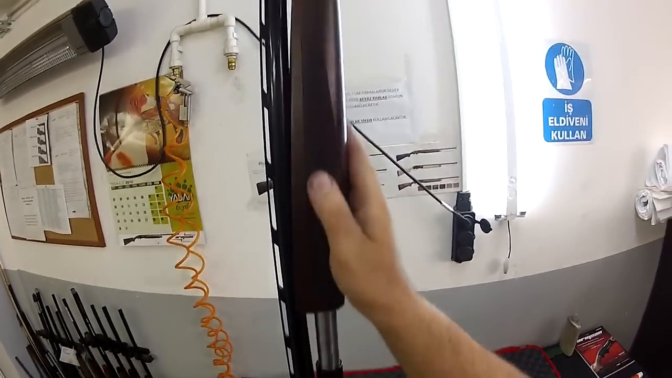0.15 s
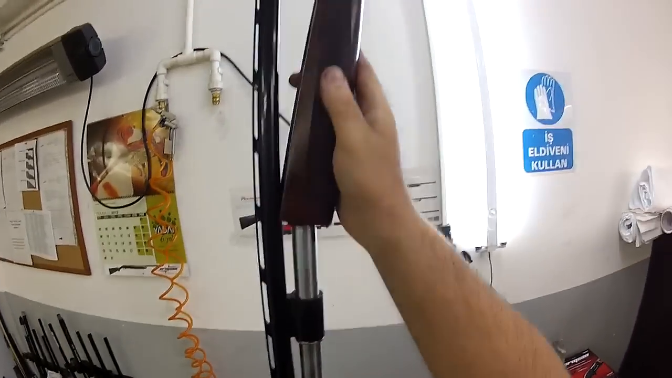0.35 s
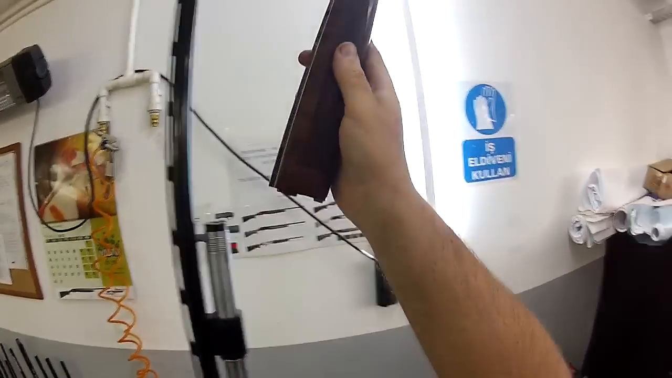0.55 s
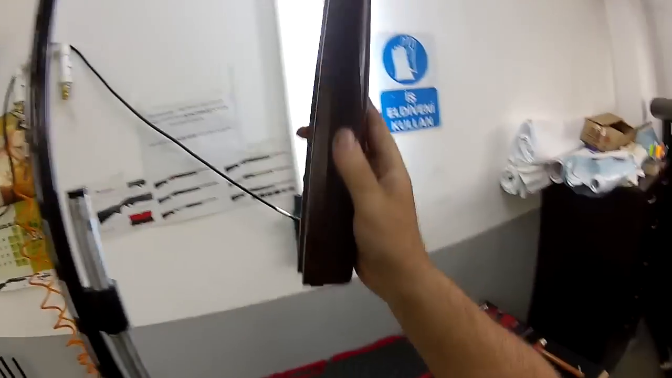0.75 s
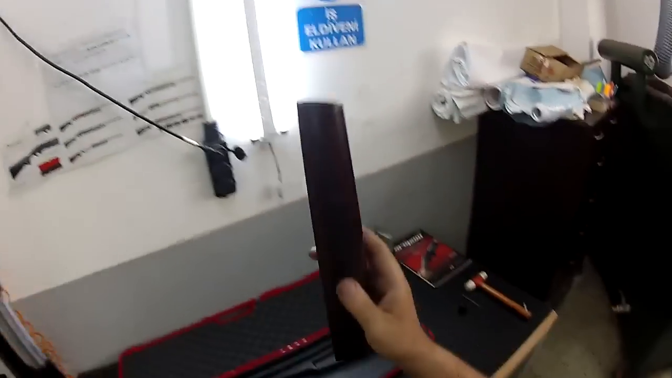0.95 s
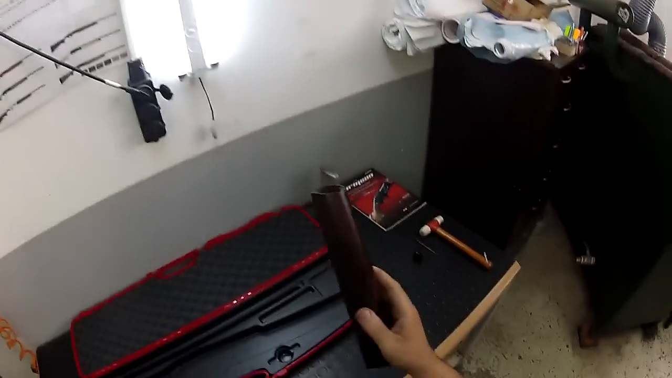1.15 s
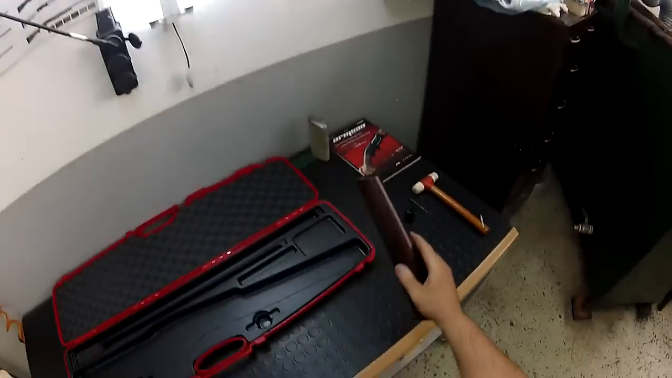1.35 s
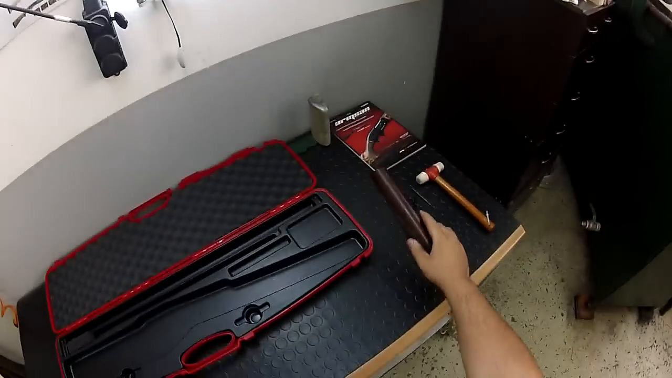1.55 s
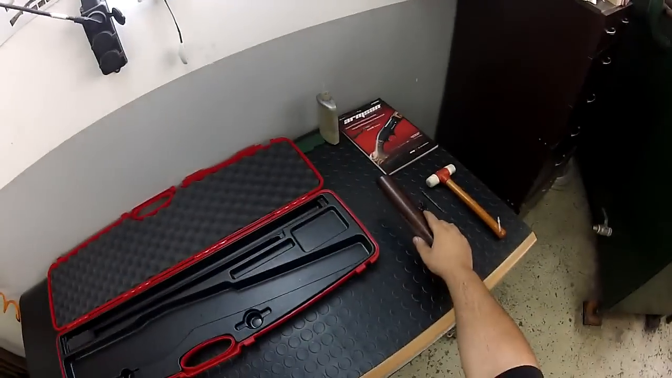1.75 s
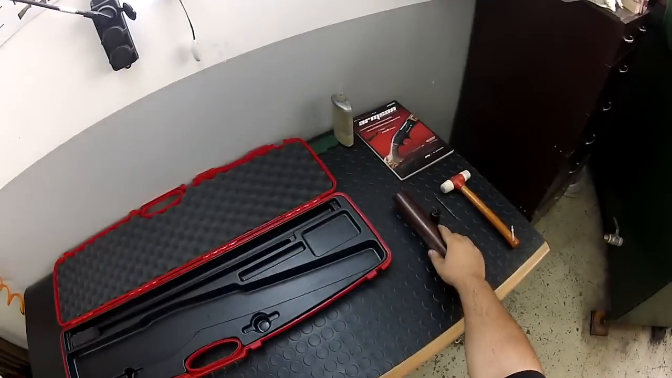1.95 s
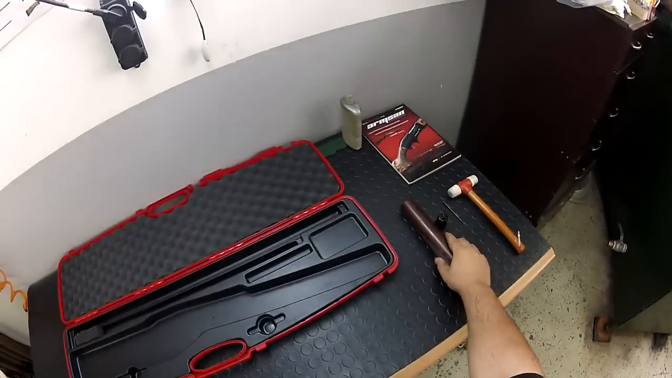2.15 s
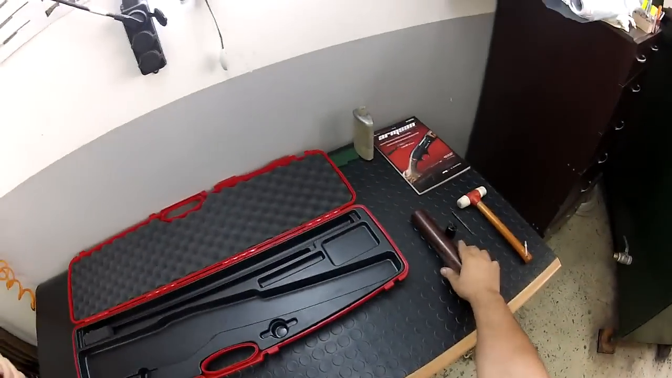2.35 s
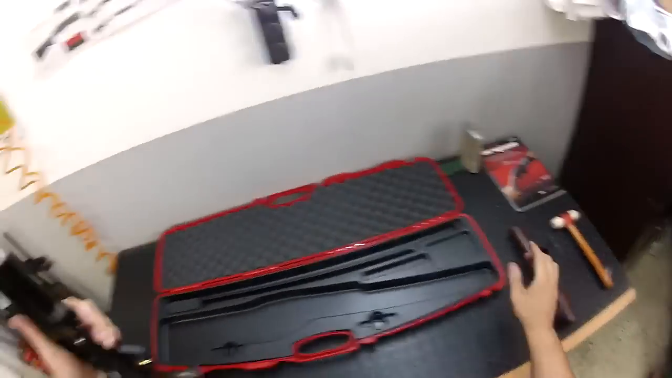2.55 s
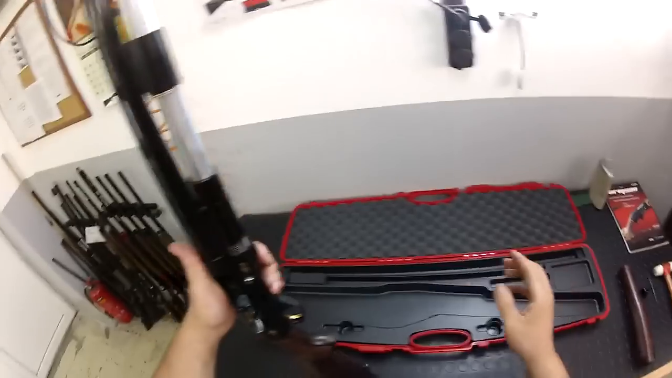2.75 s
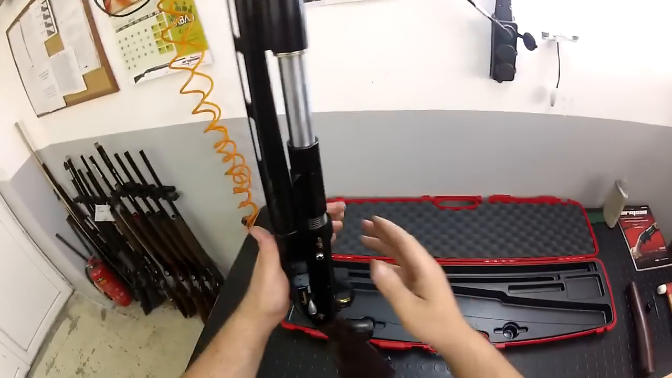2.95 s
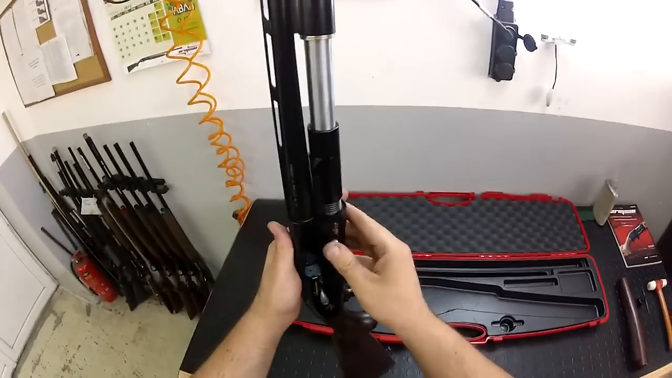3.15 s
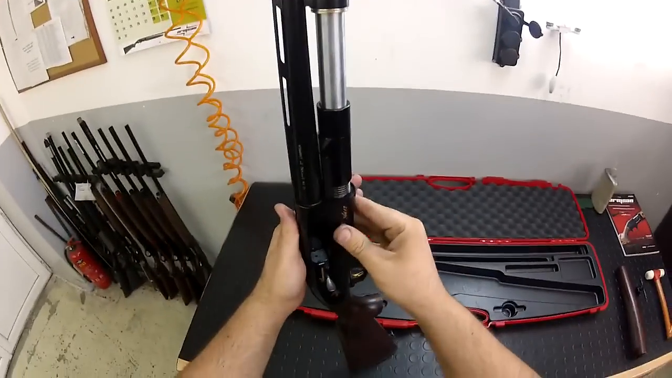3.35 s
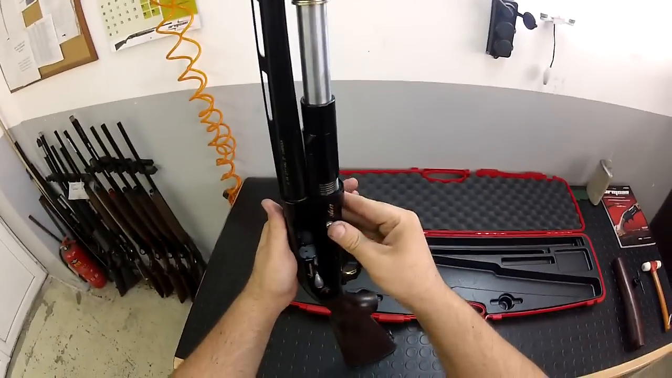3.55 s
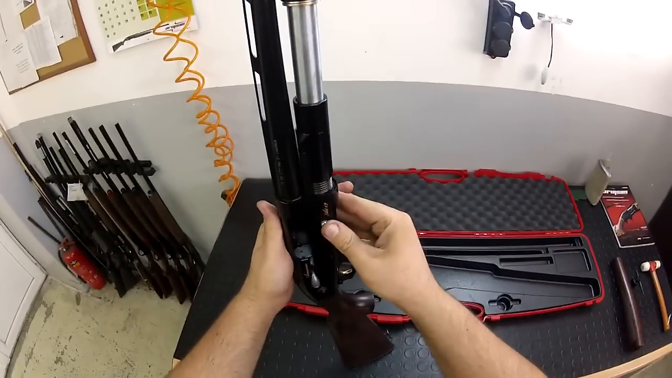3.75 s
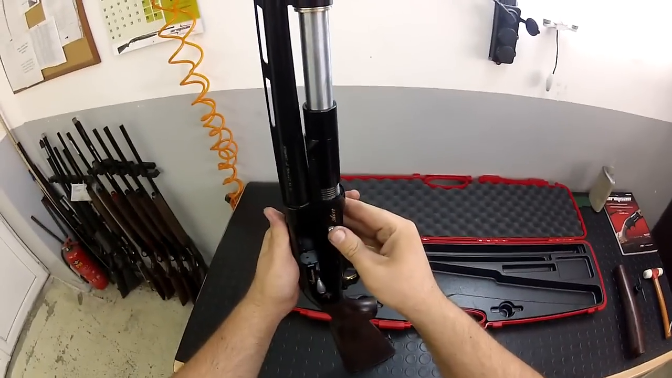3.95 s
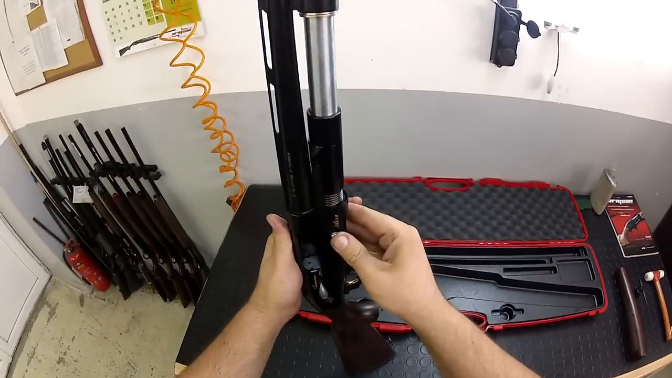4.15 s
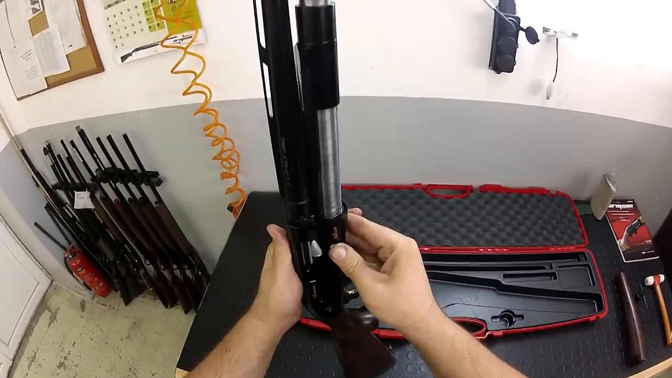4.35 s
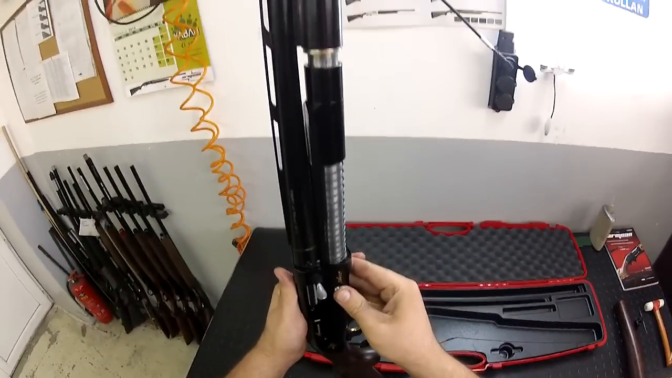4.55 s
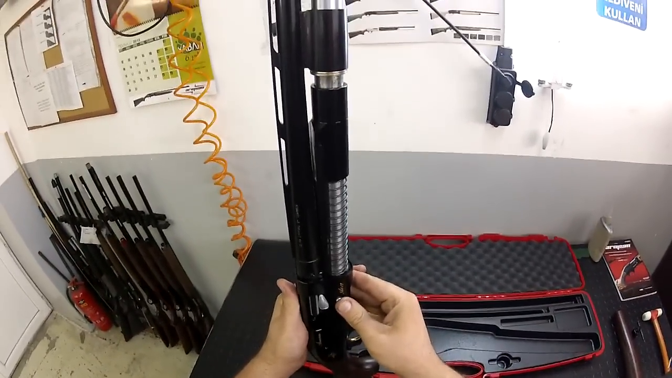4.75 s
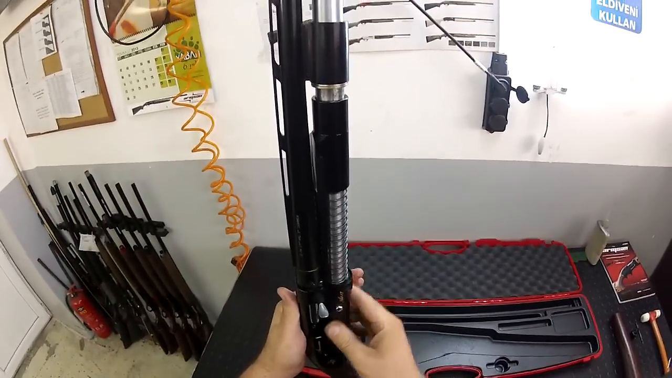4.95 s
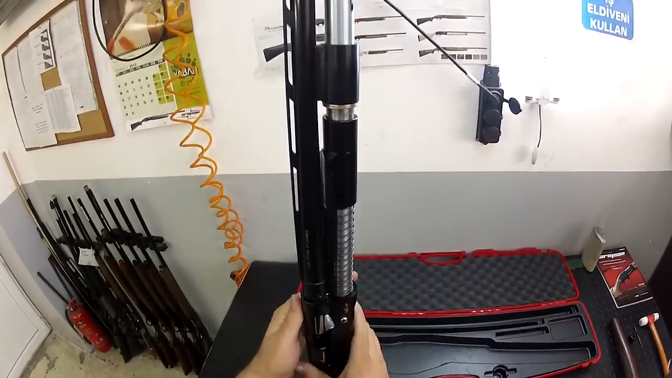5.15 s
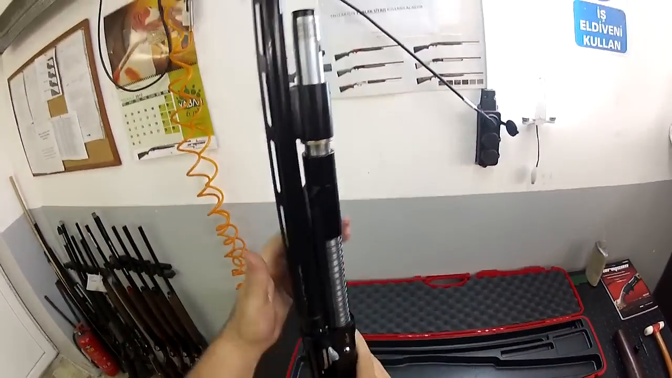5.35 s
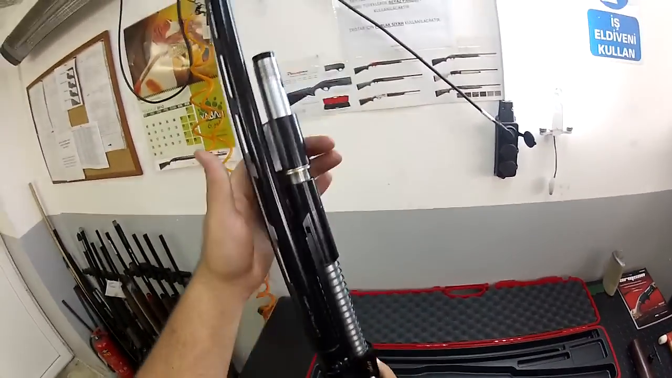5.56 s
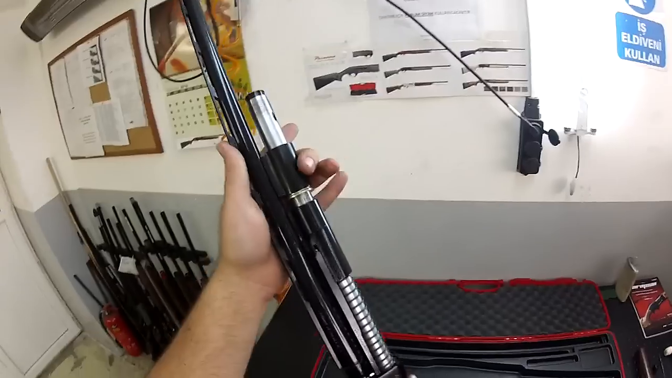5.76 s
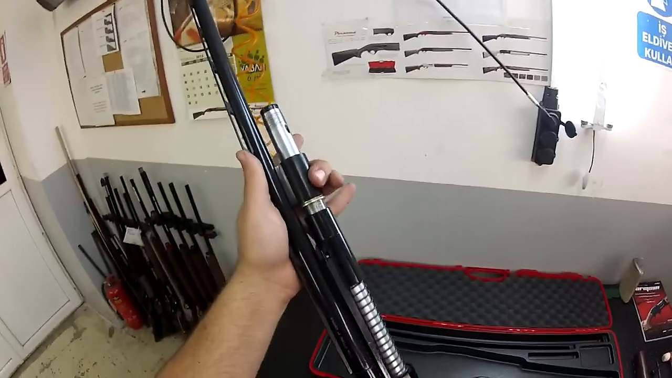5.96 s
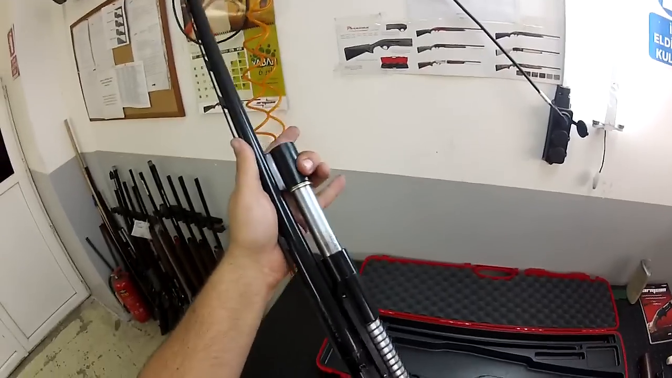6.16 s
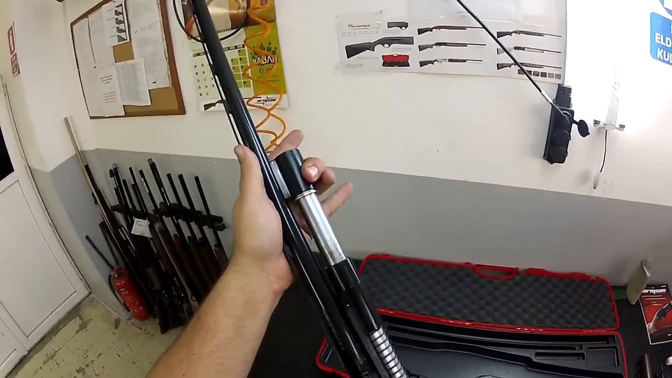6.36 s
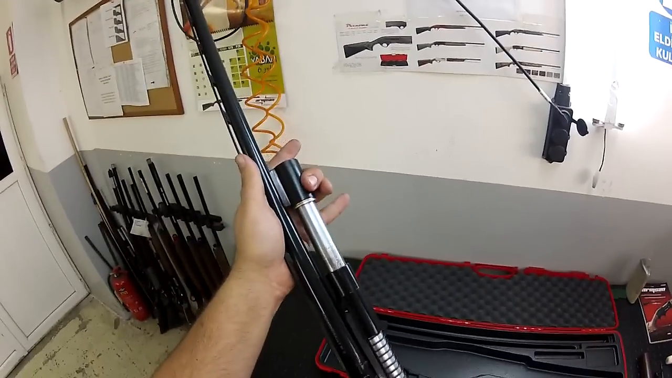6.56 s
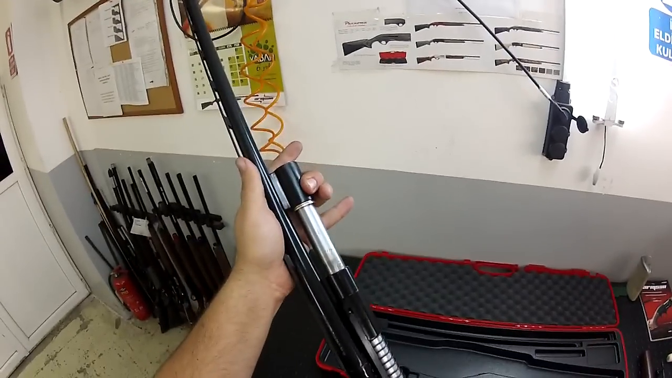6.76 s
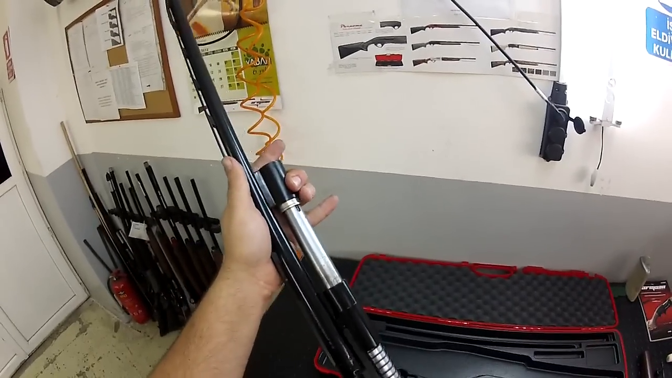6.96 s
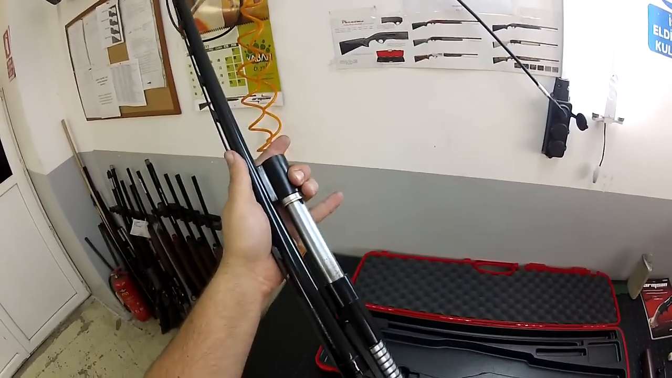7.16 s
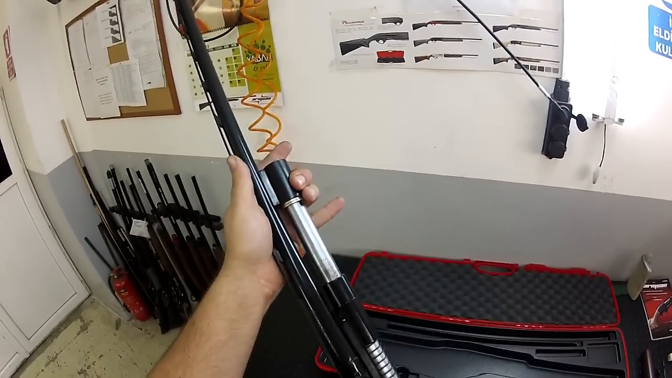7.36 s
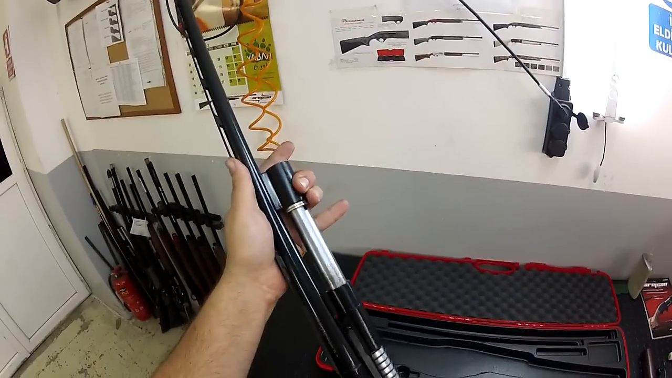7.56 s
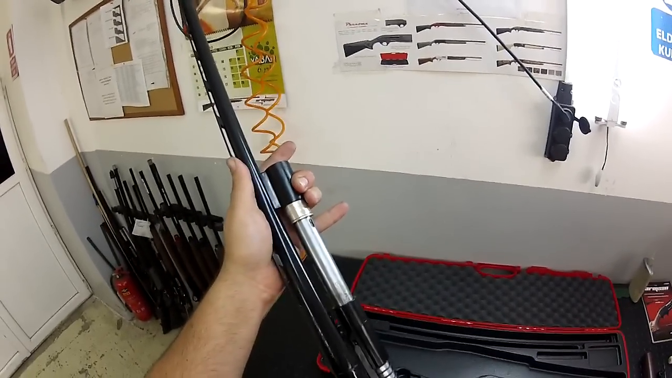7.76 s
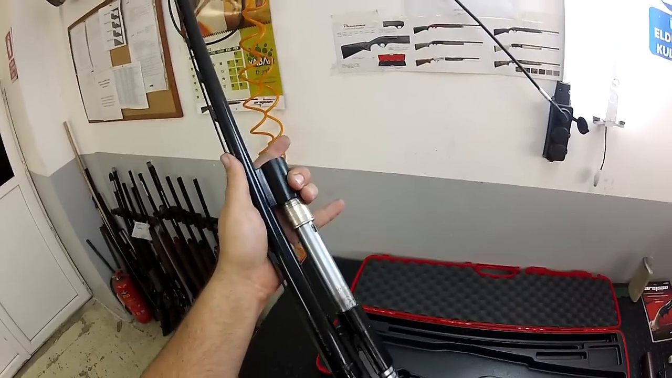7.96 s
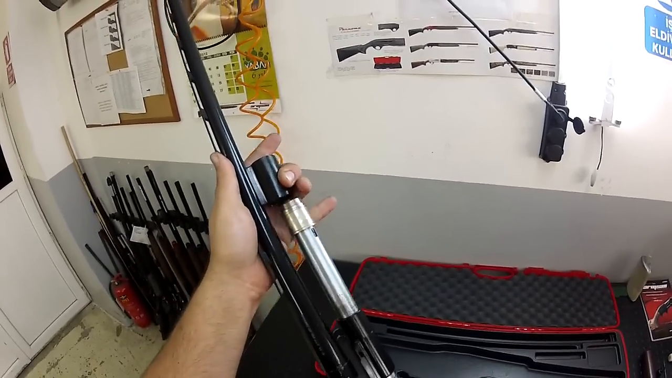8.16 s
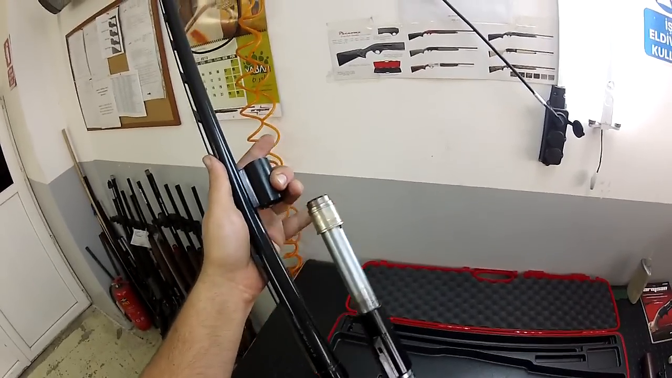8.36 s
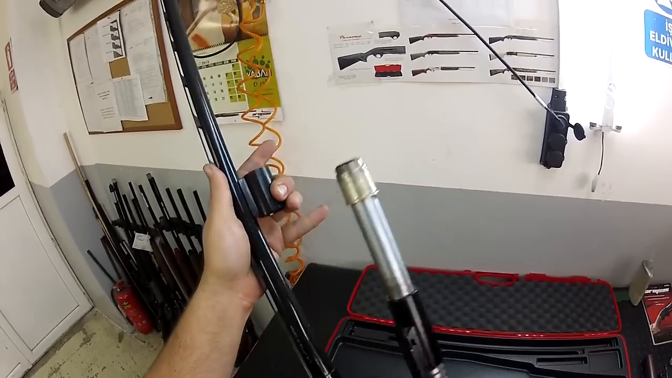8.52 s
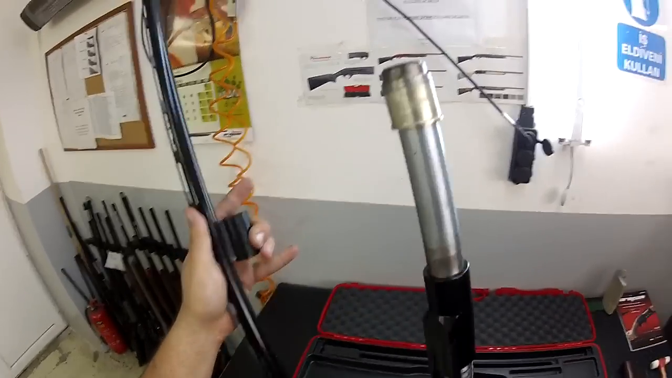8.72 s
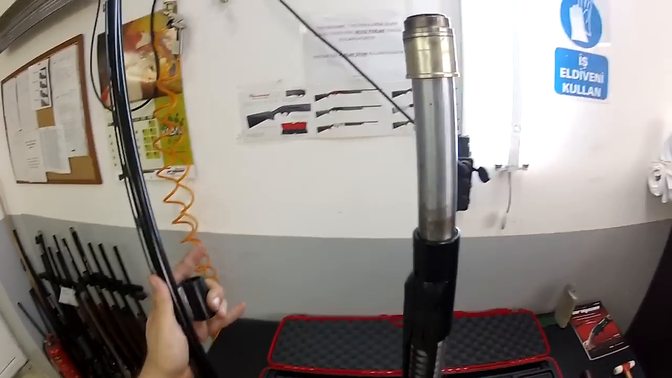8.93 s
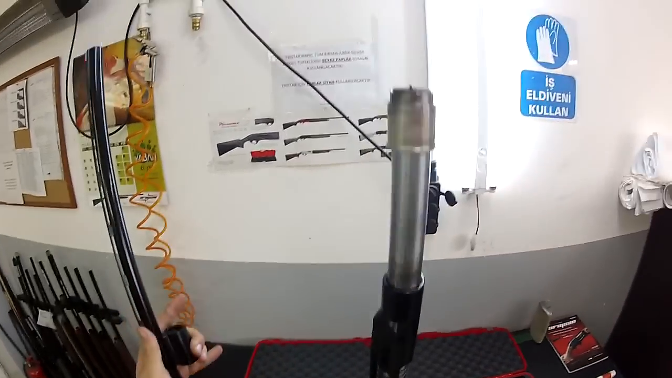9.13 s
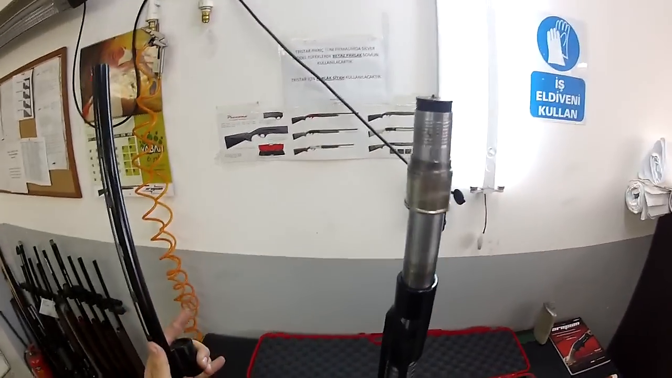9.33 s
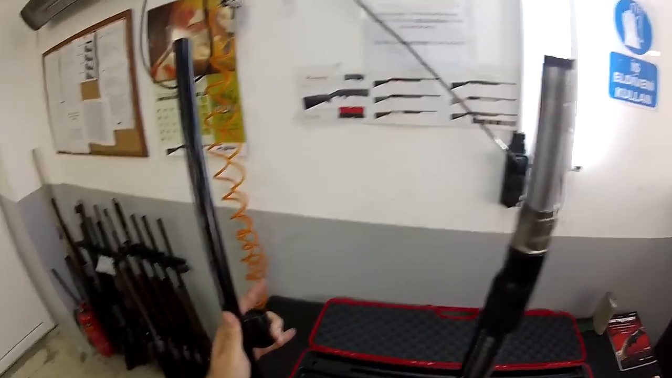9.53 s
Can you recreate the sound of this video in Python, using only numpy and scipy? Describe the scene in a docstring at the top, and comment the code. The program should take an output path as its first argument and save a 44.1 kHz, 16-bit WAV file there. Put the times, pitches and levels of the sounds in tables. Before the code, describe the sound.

Close, dry handling of a gun with dense short echoes from bare walls. First quick stick-slip squeaks and faint metal ticks, then a hollow wooden knock. A rapid metallic clatter ends in a huge clipped bolt slam. Later come a sharp barrel snap with a gritty scrape, duller clanks, light ringing clicks, a low bouncing thud with a soft rattle, and a bright final clack, all over rumble and thin hiss.

```python
"""A small hard-walled workshop, close to a body-worn camera: a shotgun is stripped by hand.
The wooden fore-end squeaks off its tube by stick and slip, and rings in short modes as it is laid on the bench.
The bolt slams shut and overloads the microphone; steel contacts are noise bursts that set each part ringing.
The barrel clicks and scrapes free over small burrs, and the stock bumps the bench in a few sagging bounces.
Dense echoes come off the walls; under it all lie a low fluttering rumble and a faint hiss of filtered noise."""
import sys
import numpy as np
from scipy import signal
from scipy.fft import rfft, irfft, next_fast_len
from scipy.io import wavfile
from scipy.ndimage import uniform_filter1d

SR = 44100
rng = np.random.default_rng(int(sys.argv[2]) if len(sys.argv) > 2 else 0)


def wav_out(sig):
    """Save sig, one row per channel (or a flat mono array), as 16-bit PCM at SR to the path in sys.argv[1]."""
    wavfile.write(sys.argv[1], SR, np.round(np.clip(np.atleast_2d(sig).T, -1, 1) * 32767).astype(np.int16))


N = 427327


def amp(db):
    """Amplitude factor of a level in dB."""
    return 10 ** (np.asarray(db) / 20)


def evened(x):
    """The signal scaled to rms 1 overall."""
    return x / np.sqrt(np.mean(x ** 2) + 1e-20)


def read(points, hz):
    """A spectrum table joined by straight lines over log frequency."""
    f, value = np.transpose(points)
    return np.interp(np.log(hz + 1), np.log(f + 1), value)


def seconds(length):
    """Sample times from zero up to the length in seconds."""
    return np.arange(int(length * SR)) / SR


def add(mix, s, sound):
    """Lay a sound into the mix at s seconds, cut off at the end."""
    part = mix[max(round(s * SR), 0):][:len(sound)]
    part += sound[:len(part)]


def colour(x, points, size=4096):
    """Causal minimum-phase filter with the given (Hz, dB) shape."""
    hz = abs(np.fft.fftfreq(size, 1 / SR))
    log_gain = np.log(amp(read(points, hz)))
    response = np.exp(np.conj(signal.hilbert(log_gain)))
    taps = np.fft.ifft(response).real[:size // 2]
    return signal.oaconvolve(x, taps)[:len(x)]


def noise(points):
    """Steady noise of rms 1 with the given (Hz, dB) spectrum."""
    size = next_fast_len(N)
    spectrum = rfft(rng.standard_normal(size))
    shape = amp(read(points, np.fft.rfftfreq(size, 1 / SR)))
    return evened(irfft(spectrum * shape, size)[:N])


def ring(modes, length, pitch=1):
    """The dying sines of a struck body; neighbouring modes swing in opposite directions."""
    t = seconds(length)
    out = np.zeros(len(t))
    for k, (hz, db, t60) in enumerate(modes):
        sine = np.sin(2 * np.pi * hz * pitch * t)
        out += (-1) ** k * amp(db) * sine / 1000 ** (t / t60)
    return out


def crack(decay, count=4096, order=128):
    """A dense noise burst of tiny contacts, dying fast; a lower order evens its spectrum more finely."""
    fall = np.exp(-np.arange(count) / SR / decay)
    spectrum = rfft(rng.standard_normal(count) * fall, 2 * count)
    spectrum /= np.sqrt(uniform_filter1d(abs(spectrum) ** 2, order))
    return irfft(spectrum)[:count] * np.linalg.norm(fall)


def steel(contacts, body_db=8, ring_db=-29):
    """Contacts sound through the crowded short modes of the whole gun, and each part adds its own ring."""
    # What each steel part rings with. Each row: frequency in Hz, relative level in dB, t60 in s.
    parts = {
        "bolt": [(139, -19, .16), (290, -18, .03), (540, -9, .015), (1200, -14, .02), (2850, 3, .02),
                 (5080, 0, .015), (6900, -14, .025), (1995, -28, .4), (2145, -25, .4), (2653, -18, .4),
                 (2821, -22, .4), (3079, -19, .3), (3407, -24, .4), (4104, -23, .4), (4247, -38, 1.4),
                 (7752, -50, 1.3)],
        "barrel": [(714, -10.5, 0.044), (1105, -8, 0.038), (2060, -3.5, 0.12), (2676, -8.5, 0.053),
                   (3075, -19.5, 0.038), (3880, -4, 0.045), (4810, -2, 0.0072), (5070, 5.5, 0.019),
                   (6930, -5, 0.025), (7370, -2, 0.018), (9200, -34, 0.033)],
        "piston": [(2150, 8, 0.079), (2342, 6.5, 0.069), (3800, -14, .03), (5140, -18, 0.044),
                   (8140, -9, 0.072), (9700, -6, 0.084)],
        "tube": [(1900, -9, .03), (2850, -2, .03), (3170, -11, .1), (3850, -8, .04), (8100, -12, .03),
                 (9050, -11, .05)],
        "collar": [(1981, -14, .2), (2950, -5.5, 0.2), (3840, -1, 0.081), (8050, -6, 0.088),
                   (8950, -13, 0.21)],  # loose on the tube
    }
    # Colour of a steel contact. Each row: frequency in Hz, gain in dB.
    steel_colour = [(70, -10.5), (170, -13.5), (400, -25.5), (1000, -10), (1450, -21), (2000, 4.5),
                    (2700, 1.5), (3600, -3), (4600, -7), (5080, -6.5), (5500, -11.5), (6500, -13.5),
                    (6900, -11.5), (7300, -15), (9900, -6.5), (10700, -36), (13300, -46), (14100, -17)]
    rung = np.zeros(N)
    for part, x in contacts.items():
        rung += signal.oaconvolve(x, ring(parts[part], 0.92))[:N]
    return amp(body_db) * colour(sum(contacts.values()), steel_colour) + amp(ring_db) * rung


def clacks():
    """Steel strikes steel: what goes straight to the microphone, and what goes to the walls."""
    # Steel meeting steel. Each row: start in seconds, place struck on the gun, relative level in dB,
    # contact decay in seconds.
    strikes = [(0.339, "tube", -37, 0.0045), (.417, "tube", -27.5, 0.0037), (.429, "tube", -27, 0.0078),
               (.455, "tube", -30, .0023), (4.312, "bolt", -30.5, .004), (4.326, "bolt", -13.5, 0.01),
               (4.342, "bolt", -4.5, 0.0087), (4.363, "bolt", 10.5, 0.0038),
               (6.129, "breech", -27.5, 0.016), (6.1575, "breech", -3.5, .001),
               (6.497, "piston", -38, 0.0016), (6.513, "tube", -29, 0.0013), (6.777, "lug", -19, 0.0041),
               (6.958, "lug", -30.5, 0.0016), (6.988, "lug", -24.5, 0.0056),
               (7.245, "breech", -33.5, 0.0022), (7.714, "piston", -28.5, 0.0045),
               (7.735, "piston", -26, 0.0027), (7.942, "collar", -30, 0.0052),
               (8.066, "collar", -35.5, .0043), (9.519, "shoulder", -12, 0.0023)]
    # How each place sounds when struck. Each entry: part that rings, hardness in dB, room send in dB.
    places = {"bolt": ("bolt", 1, 0), "breech": ("barrel", 4.5, -9), "lug": ("barrel", -8, -1),
              "piston": ("piston", -0.5, -.5), "tube": ("tube", -3.8, -4), "collar": ("collar", 3.6, -2.5),
              "shoulder": ("tube", 9.3, -4.5)}
    # How hardness tilts the treble. Each row: frequency in Hz, share of the hardness (0.5 is neutral).
    hard_shares = [(2600, 0.07), (4800, 0.97), (7500, 1), (9500, 0.22)]
    # an ordinary contact; stronger and longer ones are brighter
    usual_db, usual_decay_s = -20, .003
    brighter_db_per_db, brighter_db_per_doubling = 0.1953, 0.5

    near, sent = {}, {}
    for s, place, db, decay in strikes:
        part, hard_db, send_db = places[place]
        hard_db += brighter_db_per_db * (db - usual_db)
        hard_db += brighter_db_per_doubling * np.log2(decay / usual_decay_s)
        # the strike's level rides on its treble tilt
        tone = [(hz, db + hard_db * (share - .5)) for hz, share in hard_shares]
        direct = colour(crack(decay), tone)
        add(near.setdefault(part, np.zeros(N)), s, direct)
        # the burst sent to the walls has a more finely evened spectrum
        to_walls = amp(send_db) * colour(crack(decay, order=8), tone)
        add(sent.setdefault(part, np.zeros(N)), s, to_walls)
    return steel(near), steel(sent)


def echoed(x):
    """Nearby surfaces repeat each click within milliseconds."""
    # First echoes from the chest and the bench. Each row: delay in seconds, level in dB.
    echoes = [(.0022, -7), (.0073, -16)]
    out = x.copy()
    for delay, db in echoes:
        add(out, delay, amp(db) * x)
    return out


def jolts():
    """The slam punches the camera's mount, which also sways slowly after a hard pull."""
    # Jolts through the body. Each row: start in seconds, level in dB, frequency in Hz, t60 in seconds.
    mount_jolts = [(4.3622, 2, 173, 0.025), (6.162, -25, 33.3, .2), (6.8, -33, 50, 0.2),
                   (7.02, -29.5, 40.3, 0.27)]
    out = np.zeros(N)
    for s, db, hz, t60 in mount_jolts:
        add(out, s, ring([(hz, db, t60)], 0.3))
    return out


def scrapes(grains_per_s=1500, grit=0.9):
    """Sliding steel catches on many small burrs."""
    # Parts sliding on each other. Each row: start in seconds, part, length in seconds, relative level in dB.
    slides = [(0.026, "tube", 0.025, -41.5), (0.143, "tube", 0.19, -51), (0.28, "tube", 0.041, -44.5),
              (6.111, "barrel", 0.071, -29), (7.68, "piston", 0.066, -39.5), (8.017, "collar", 0.071, -49),
              (8.142, "collar", 0.042, -52)]
    contacts = {}
    for s, part, length, db in slides:
        count = int(length * SR)
        burrs = rng.standard_normal(count) * (rng.random(count) < grains_per_s / SR)
        friction = grit * evened(burrs) + .5 * rng.standard_normal(count)
        slide = amp(db) * friction * signal.windows.tukey(count, .5)
        add(contacts.setdefault(part, np.zeros(N)), s, slide)
    return steel(contacts)


def squeak(length, glide, overtone_db, order):
    """Stick and slip: an unsteady pitch with one overtone of the given order, rasping as it slips."""
    jitter_hz, rasp = 35, .35
    count = int(length * SR)
    waver, grip = evened(uniform_filter1d(rng.standard_normal((2, count)), 36))
    pitch_hz = np.linspace(*glide, count) + jitter_hz * waver
    phase = 2 * np.pi * np.cumsum(pitch_hz) / SR
    tone = np.sin(phase) + amp(overtone_db) * np.sin(order * phase)
    return evened(tone * (1 + rasp * grip)) * signal.windows.tukey(count, .5)


def squeaks():
    """The fore-end slides off its tube with low falling chirps and high rising squeals."""
    # The fore-end sticking and slipping. Each row: start in seconds, length in seconds, level in dB.
    chirps = [(0.037, 0.017, -38), (0.141, 0.019, -41.5), (0.167, .028, -45), (0.206, 0.056, -44.5)]
    # Every chirp sags alike: first pitch in Hz, last pitch in Hz.
    chirp_glide = (1140, 897)
    # Thin squeals. Each row: start in seconds, length in seconds, first pitch in Hz, level in dB.
    squeals = [(.05, .034, 2930, -37), (.09, .035, 3170, -45)]
    squeal_rise = 1.028  # last pitch over first, as the fore-end gathers speed
    out = np.zeros(N)
    for s, length, db in chirps:
        add(out, s, amp(db) * squeak(length, chirp_glide, overtone_db=-6.5, order=2))
    for s, length, hz, db in squeals:
        add(out, s, amp(db) * squeak(length, (hz, hz * squeal_rise), overtone_db=-10, order=3))
    return out


def knocks(tick_db=-25, tick_decay=0.0094, clatter_db=-12, clatter_decay=0.021):
    """Wood on the bench: a longer contact leaves out the high modes; the thin shell clatters briefly."""
    # The fore-end laid down, one end and then the other.
    # Each row: start in seconds, relative level in dB, contact time in seconds.
    landings = [(2.0638, -9, 0.0008), (2.0672, -18, 0.0001)]
    # What the wooden fore-end rings with. Each row: frequency in Hz, relative level in dB, t60 in seconds.
    wood_modes = [(270, -12, 0.045), (480, -4, 0.055), (712, -3.5, 0.053), (890, -9, 0.056),
                  (1030, -3, 0.025), (1320, -28, 0.026), (1930, -0.5, 0.036), (2520, -1, 0.015),
                  (2740, 1.5, 0.014), (4380, -16, 0.017)]
    tick_colour = [(7500, -3), (10500, 11), (15000, -3)]  # (Hz, dB), as below
    clatter_colour = [(80, -26), (140, 12), (700, 7.5), (1150, 13), (1500, -3), (2900, -4.0),
                      (3600, -16), (8000, -22)]
    out = np.zeros(N)
    for s, db, contact in landings:
        push = np.exp(-seconds(.01) / contact * 2)
        add(out, s, amp(db) * np.convolve(ring(wood_modes, .2), push / push.sum()))
        add(out, s, amp(db + tick_db) * colour(crack(tick_decay), tick_colour))
        add(out, s, amp(db + clatter_db) * colour(crack(clatter_decay), clatter_colour))
    return out


def bumps(rattle_db=-23, rattle_decay=0.038, count=6):
    """The stock bounces on the padded bench, each bump weaker and lower, and loose parts rattle softly."""
    # What stock and bench ring with. Each row: first bump's frequency in Hz, relative level in dB, t60 in s.
    bench_modes = [(130, 0, 0.076), (279, 0, 0.08), (448, -15, 0.1), (947, -19, 0.074), (1210, -20, 0.11),
                   (2020, -18, 0.069)]
    start_s, first_gap_s, gap_growth = 9.235, .011, 1.35
    first_db, fade_db_per_s, sag_octaves_per_s = -19.5, 84, 4.6
    rattle_colour = [(1000, 16.5), (2400, 17.0), (4500, -1), (12000, 0.0)]  # (Hz, dB)
    out, since = np.zeros(N), 0
    for k in range(count):
        s = start_s + since
        db = first_db - fade_db_per_s * since
        pitch = 2 ** (-sag_octaves_per_s * since)
        add(out, s, amp(db) * ring(bench_modes, .3, pitch))
        add(out, s, amp(db + rattle_db) * colour(crack(rattle_decay), rattle_colour))
        since += first_gap_s * gap_growth ** k
    return out


def room(x, gap=0.0034, build=0.0028):
    """Dense reflections swell after a short gap in seconds; each band dies at its own speed."""
    # The workshop. Each row: frequency in Hz, t60 in seconds.
    room_t60 = [(120, 0.88), (500, 0.51), (1400, 0.78), (3000, 0.64), (8000, .62), (15000, 0.77)]
    hz, t, z = signal.stft(rng.standard_normal(SR), SR, nperseg=256)
    dying = z / 1000 ** (t / read(room_t60, hz)[:, None])
    tail = signal.istft(dying, SR, nperseg=256)[1][:SR]
    tail *= 1 - np.exp(-np.maximum(seconds(1) - gap, 0) / build)
    return signal.oaconvolve(x, tail / np.linalg.norm(tail))[:N]


def background(flutter=0.47, sharpness=0.69):
    """Low rumble, fluttering fast above its deepest part, and thin steady hiss."""
    # Steady background. Each row: frequency in Hz, relative level in dB per Hz.
    rumble_shape = [(12, -30), (20, -3.5), (48, -1), (80, -7.5), (123, -3), (149, -7), (183, -1),
                    (205, -8.5), (236, -5), (264, -6.5), (900, -24.5), (1170, -27.5), (1980, -120)]
    hiss_shape = [(400, -1), (900, -1.5), (1600, -2.5), (2100, -2.5), (3200, -7.5), (5300, -12.5),
                  (6000, -25), (6750, -14), (10000, -16), (13000, -20), (15000, -17.5), (15600, -40.5)]
    rumble_db, hiss_db, flutter_hz = -41, -51, 60
    beat = np.exp(sharpness * np.cos(2 * np.pi * flutter_hz * np.arange(N) / SR))
    rumble = noise(rumble_shape)
    lowpass = signal.butter(2, 100, fs=SR, output="sos")
    deep = signal.sosfiltfilt(lowpass, rumble)
    rumble = deep + (rumble - deep) * evened(1 + flutter * beat)
    return amp(rumble_db) * rumble + amp(hiss_db) * noise(hiss_shape)


def self_noise(level_db=-60.5):
    """The microphone's own hiss, steady noise that is unlike on the two sides."""
    # Each row: frequency in Hz, relative level in dB per Hz.
    self_noise_shape = [(30, 12), (200, 14.5), (500, 6), (1000, 1), (5000, -1), (6000, -17), (6800, -2.5),
                        (9500, -13), (11000, -27.5)]
    return amp(level_db) * noise(self_noise_shape)


def scene(rub_room_db=-3, knock_room_db=-5, bump_room_db=-8):
    """All handling is heard in the middle; only the microphone's hiss has width."""
    # Microphone in its housing. Each row: frequency in Hz, gain in dB.
    housing = [(5300, 0), (5600, -6), (6000, -16), (6350, -5), (6800, 0), (13400, 0), (14100, 4),
               (15150, 6), (15700, -10)]
    near, sent = clacks()
    rub, knock, bump = scrapes() + squeaks(), knocks(), bumps()
    to_walls = sent + amp(rub_room_db) * rub + amp(knock_room_db) * knock + amp(bump_room_db) * bump
    airborne = echoed(near) + rub + knock + bump + room(to_walls)
    mid = colour(airborne, housing) + jolts() + background()
    side = self_noise()
    return np.array([mid + side, mid - side])


def record(dry):
    """The slam overloads the input and clips; then a steep low-pass limits the band."""
    edge_hz = 16300
    clipped = np.clip(dry, -1, 1)
    lowpass = signal.firwin(255, edge_hz, window=("kaiser", 9), fs=SR)
    return signal.oaconvolve(clipped, lowpass[None], "same")


dry = scene()
out = record(dry)
wav_out(out)
```